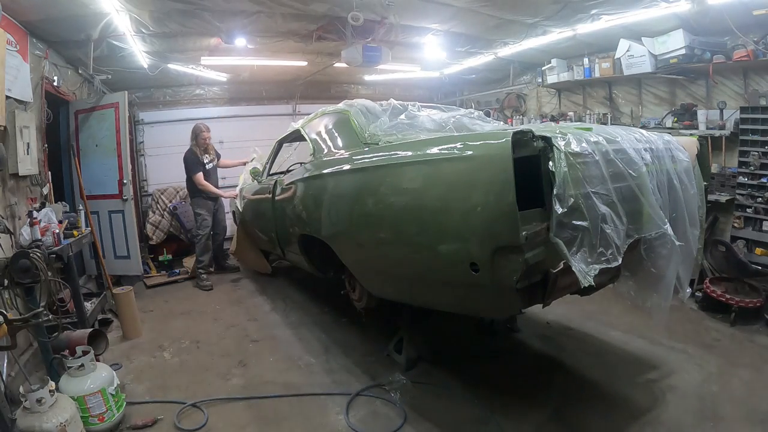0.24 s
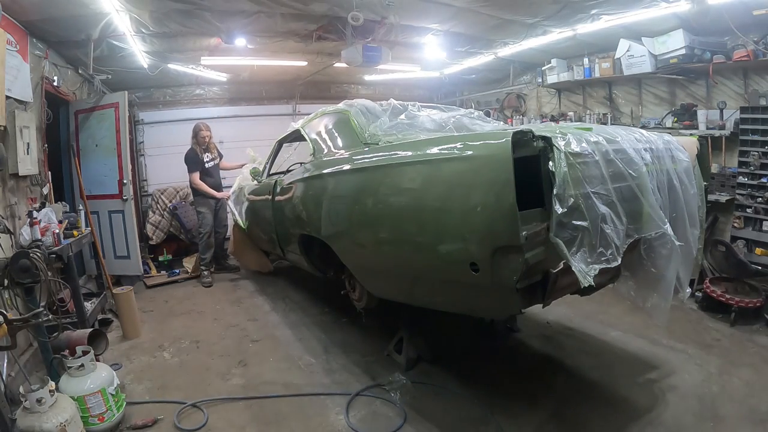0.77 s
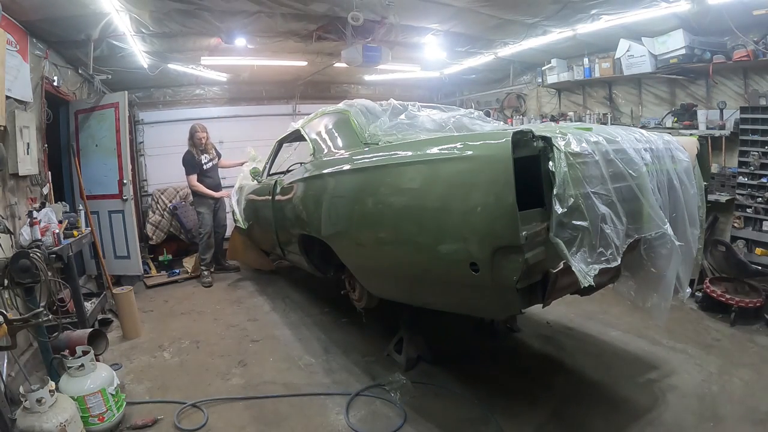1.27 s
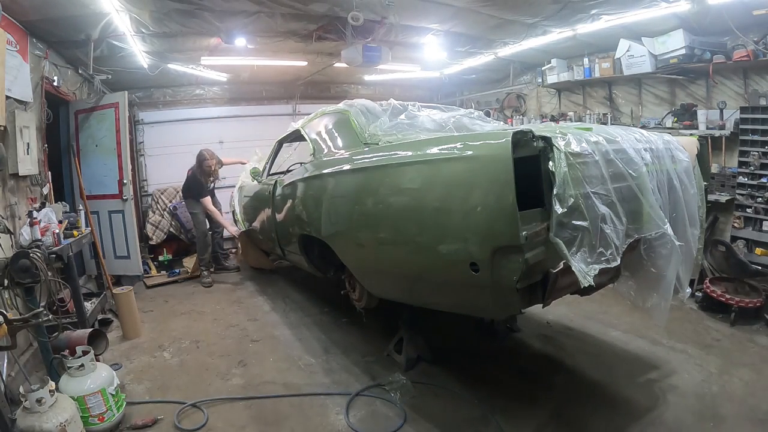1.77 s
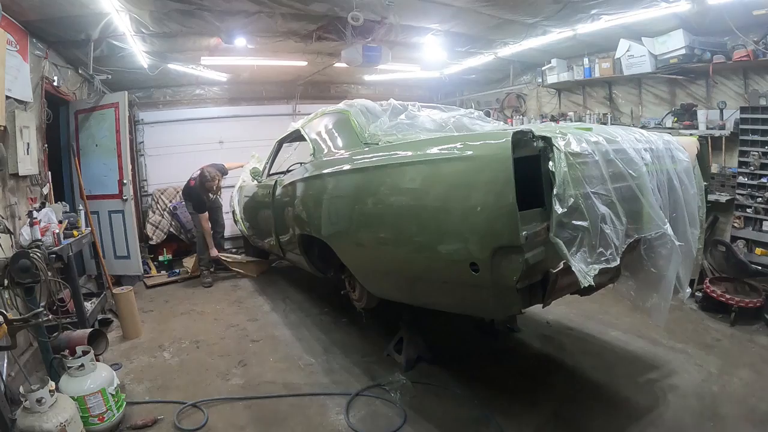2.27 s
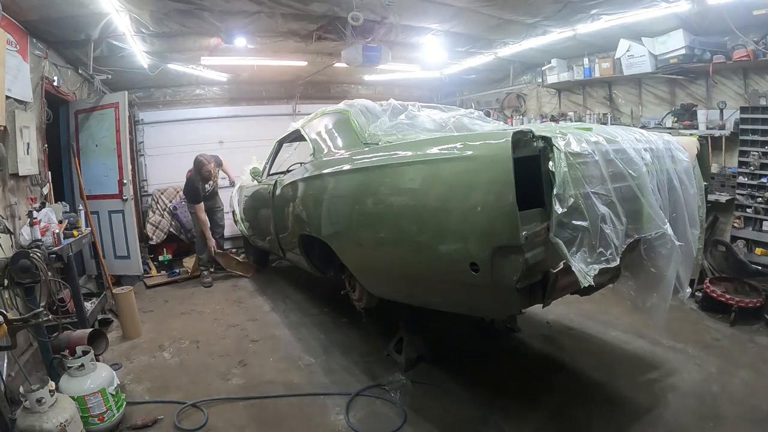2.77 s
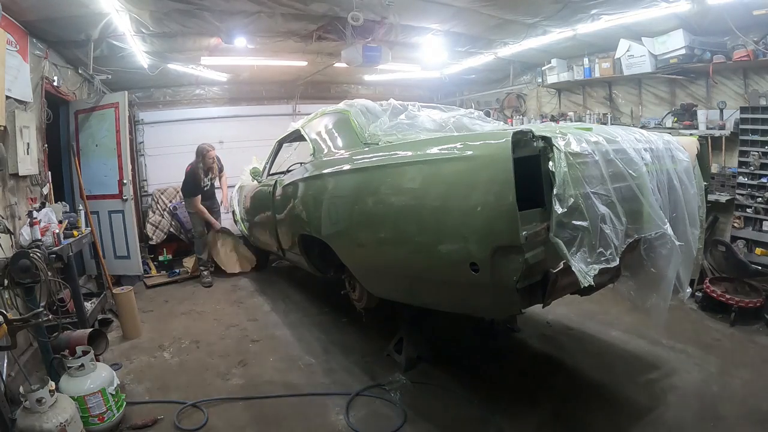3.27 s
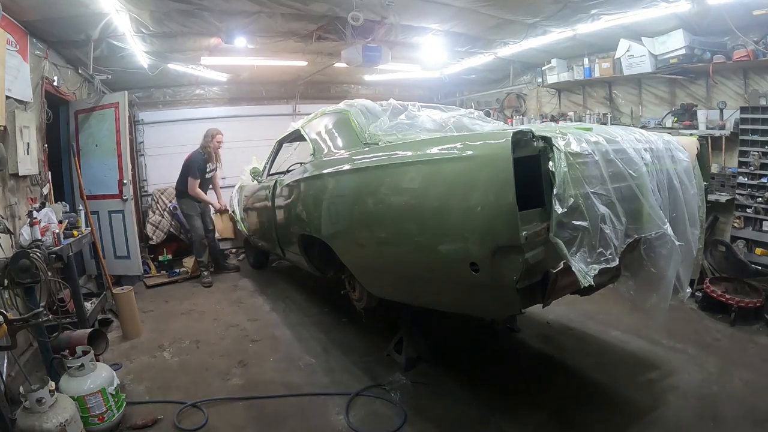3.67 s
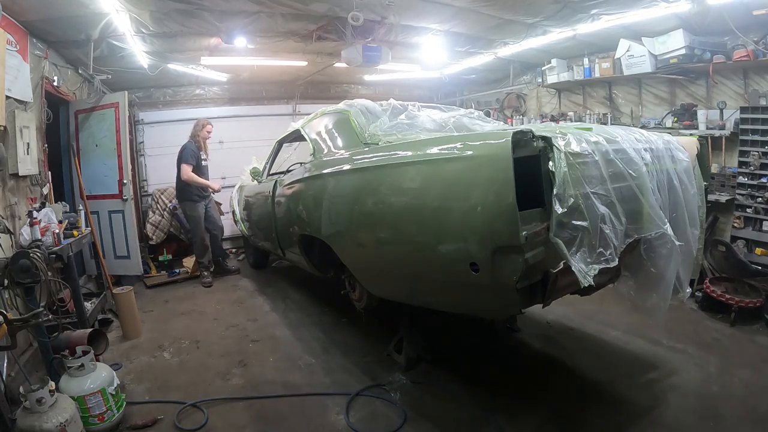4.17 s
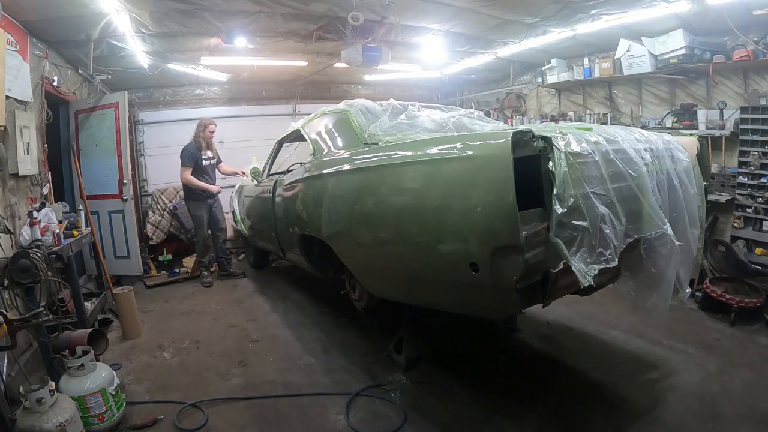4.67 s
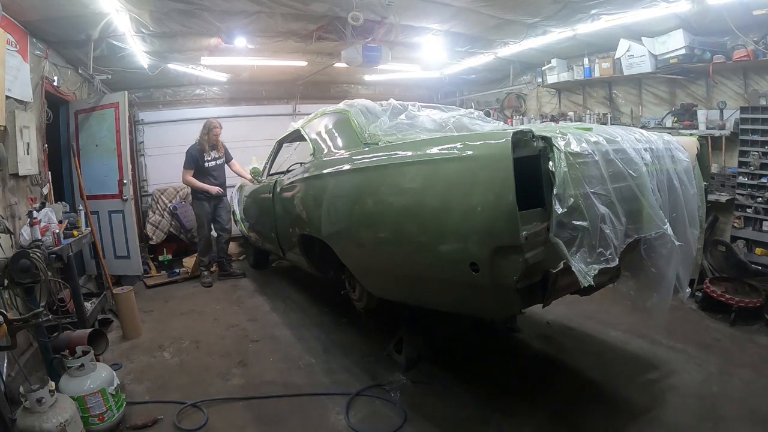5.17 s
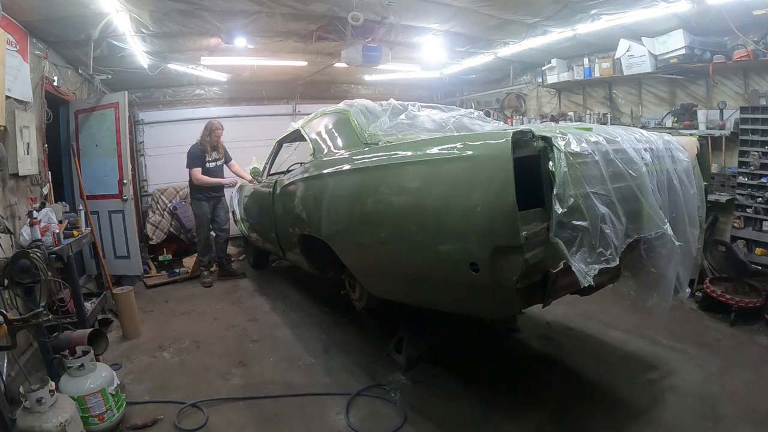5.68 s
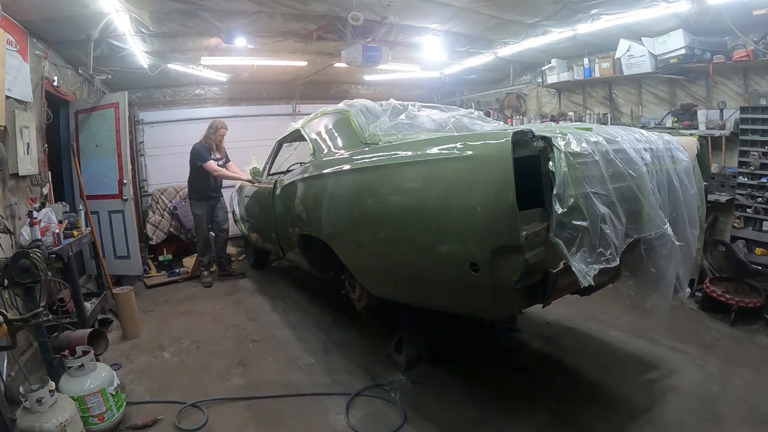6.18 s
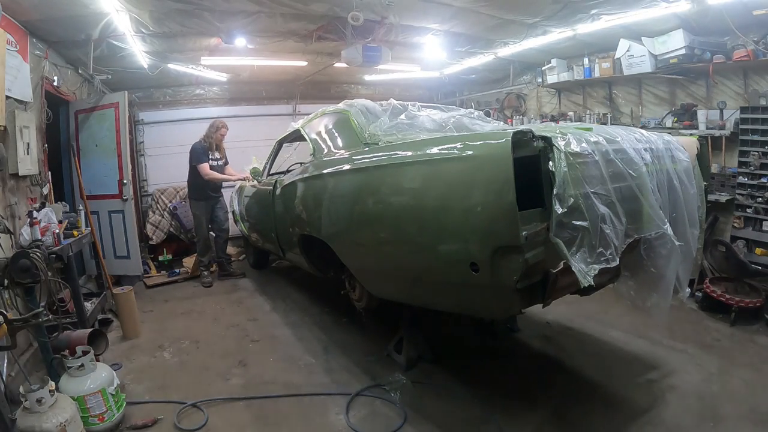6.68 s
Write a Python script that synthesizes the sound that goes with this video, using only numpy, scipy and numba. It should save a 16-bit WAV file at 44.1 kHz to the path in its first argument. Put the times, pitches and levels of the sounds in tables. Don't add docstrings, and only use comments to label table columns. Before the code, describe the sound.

Someone strips masking tape, paper and plastic sheet from a car body in a cluttered garage. Sharp ripping snaps and crinkly crackles burst out early, loudest around 0.7 and 2.1 seconds, with a soft thump and a short squeaky rub. More crumpling follows near 3.7 and 5 seconds, then sparse faint ticks. The stereo microphone stands several metres away, catching short room reflections, soft hiss and faint deep rumble.

```python
import sys
import numpy as np
from scipy import signal
from scipy.fft import rfft, irfft, next_fast_len
from scipy.io import wavfile
from scipy.ndimage import uniform_filter1d
from numba import njit

SR = 44100
rng = np.random.default_rng(int(sys.argv[2]) if len(sys.argv) > 2 else 0)


def undo_db(level):
    steps = np.asarray(level, float) / 20
    return 10 ** steps


def int16_out(signal):
    q = np.round(np.clip(np.atleast_2d(signal).T, -1, 1) * 32767)
    wavfile.write(sys.argv[1], SR, q.astype(np.int16))


N = 306054
TIME = np.arange(N) / SR


def shape(x, table):
    hz, db = np.transpose(table)
    log_hz = np.log(np.linspace(1, SR / 2, 1025))
    log_gain = np.interp(log_hz, np.log(hz), db) * np.log(10) / 20
    cepstrum = irfft(log_gain)
    cepstrum[1:1024] *= 2
    cepstrum[1025:] = 0
    response = irfft(np.exp(rfft(cepstrum)))
    return signal.fftconvolve(x, response)[:len(x)]


def band(x, lo_hz, hi_hz):
    return signal.sosfilt(signal.butter(2, [lo_hz, hi_hz], "band", fs=SR, output="sos"), x)


def unit(x):
    return x / np.sqrt(np.mean(x ** 2))


@njit
def ring_grains(count, start, hz, cycles, size, sr):
    out = np.zeros(count + 4096)
    for k in range(len(start)):
        turn = np.exp((2j * np.pi - 2.3 / cycles[k]) * hz[k] / sr)
        z = size[k] + 0j
        for i in range(min(4000, int(3 * cycles[k] * sr / hz[k]))):
            z *= turn
            out[start[k] + i] += z.imag
    return out[:count]


def grains(when_s, hz, cycles, size):
    return ring_grains(N, (when_s * SR).astype(np.int64), hz, cycles, size, 1. * SR)


def total(db):
    return 10 * np.log10(np.sum(undo_db(db) ** 2, axis=0) + 1e-12)


def hump(start, end, rise_db_s, fall_db_s):
    return -rise_db_s * np.maximum(start - TIME, 0) - fall_db_s * np.maximum(TIME - end, 0)


# f/Hz, level/dB
WIDE = [(100, -10), (400, -11.5), (1000, -11), (2500, -6.5), (5000, -8), (9000, -9), (13000, -4)]


def widen(side):
    return shape(side, WIDE)


# peak t/s, level/dB
RUMBLE = [(0.0, -49), (.25, -48), (.44, -56), (.79, -48.5), (1.02, -57), (1.33, -55.5), (1.59, -51),
          (1.91, -54), (2.3, -55), (2.45, -61), (2.72, -55), (3.17, -51.5), (3.45, -54), (3.72, -55.5),
          (3.9, -63), (4.04, -55), (4.46, -51), (4.75, -57.5), (5.1, -53.5), (5.39, -57), (5.55, -56),
          (5.85, -53.5), (6.11, -49), (6.3, -51.5), (6.75, -55)]
RUMBLE_DB_S = 91
# f/Hz, level/dB per Hz
HUSH = [(35, -13), (60, -32), (81, -11.5), (182, 6), (448, -10.5), (539, -11.5), (875, -15.5), (1270, -6.5),
        (2470, -28.5), (6840, -22), (10400, -32.5), (12200, -29.5), (15000, -44)]
HUSH_DB = -67


def background():
    s, db = np.transpose(RUMBLE)[:, :, None]
    swell_db = total(db + hump(s, s, RUMBLE_DB_S, RUMBLE_DB_S))
    rumble = undo_db(swell_db) * unit(band(rng.standard_normal(N), 26.5, 37))
    sway_db = np.array([[1.3], [-1.3]]) * np.sin(9 * TIME)
    mid, side = (shape(rng.standard_normal(N), HUSH) for _ in range(2))
    side = widen(side) * undo_db(7.0)
    hiss = undo_db(HUSH_DB) * np.array([mid + side, mid - side]) / np.std(mid)
    return rumble * undo_db(sway_db) + hiss


# t/s, crinkle level/dB, fine crackle level/dB re crinkle
HANDLING = [(0.0, -58.5, 3), (.45, -48, 4), (.66, -40, 3.5), (.76, -50, 2), (1.15, -59, -0.5),
            (1.5, -51.5, -0.5), (1.8, -55.5, 2), (2.3, -39, -6.5), (2.78, -44.5, -0.5), (3.3, -47.5, -7.5),
            (4.35, -57, 4.5), (4.55, -46, -0.5), (4.99, -74, -10), (5.2, -48.5, -2), (5.9, -82.5, -2.5),
            (6.45, -74.5, 0.5), (6.6, -63, 1.5), (6.94, -68, 2)]
HANDLING_FOLD_DB = -12.5


def handling():
    s, *columns = np.transpose(HANDLING)
    crinkle, fine = (np.interp(TIME, s, column) for column in columns)
    return crinkle, crinkle + fine, crinkle + HANDLING_FOLD_DB


# start t/s, hold t/s, crinkle level/dB, fine crackle and big-fold flap level/dB re crinkle
RIPS = [(0.0433, .012, -46.5, -1.5, -20), (.7042, 0.033, -27, 2, -8), (0.9053, .045, -33, 5.5, -11),
        (1.275, .02, -51, 8, -16), (1.3196, 0.054, -52.5, 10.5, 0), (1.3722, .058, -40, 6, -3),
        (1.8537, 0.12, -47.5, -9, -10), (1.9176, 0.11, -33.5, -1.5, -3), (2.2063, 0.019, -35, 1.9, -30),
        (2.39, 0.043, -36, -1, -33), (2.4943, .006, -47, 8, -22), (2.588, 0.035, -39, 3.5, -13),
        (2.8606, 0.054, -37.5, 0.5, -4.5), (3.088, .008, -41, 6, -16), (3.5925, 0.057, -36.5, -0.5, -6),
        (4.07, 0.036, -35, 2.5, -11.5), (4.365, 0.014, -37, -3, -28), (4.592, 0.015, -42, 1, -23),
        (4.982, .05, -40, 1, -21), (5.455, .012, -45.5, -3, -25), (5.567, 0.051, -49, -2.5, -28),
        (5.764, .02, -76, 10.5, -11), (6.1499, 0.058, -61.5, -1.5, 6), (6.5077, .03, -55, -2.5, -9)]
RIP_LAG_S, RIP_ATTACK_S = .0015, 0.0034
FADE_DB_S = 190


def rips():
    s, hold, db, fine, fold = np.transpose(RIPS)[:, :, None]
    crinkle = db + hump(s + RIP_LAG_S + RIP_ATTACK_S, s + hold, 20 / RIP_ATTACK_S, FADE_DB_S)
    return crinkle, crinkle + fine, crinkle + fold


# t/s, peak level/dB,
# ring f/Hz
SNAPS = [(0.145, -37.5, 1380), (0.4638, -34, 4570), (0.709, -11, 1290), (2.4956, -20, 4000),
         (1.7315, -38, 1950), (2.0772, -13, 1430), (2.1276, -16.5, 925), (2.4162, -29, 2850),
         (2.541, -32, 4060), (2.6068, -23.5, 5000), (3.0081, -40, 920), (1.3158, -35.5, 5500),
         (3.4089, -24, 1450), (3.491, -20.5, 3400), (3.6863, -14.5, 1090), (3.7445, -24.5, 2270),
         (3.8727, -37, 2640), (1.3734, -27, 1500), (3.976, -31, 1650), (4.0252, -27, 1100),
         (5.0113, -22, 2370), (5.0379, -22, 1300), (5.3219, -32.5, 1870), (6.2256, -30, 1200),
         (6.7147, -58, 2780), (6.8376, -37, 1430)]
SNAP_DB, SNAP_PER_FINE = 12.5, -0.11
SNAP_HZ, DB_PER_OCTAVE = 1660, 4.5


def snaps():
    s, _, db, fine, _ = np.transpose(RIPS)
    snap_db = db + SNAP_PER_FINE * np.maximum(fine, 0) + SNAP_DB
    hz = SNAP_HZ * 2 ** (np.maximum(fine, -2) / DB_PER_OCTAVE)
    return np.hstack([[s, snap_db, hz], np.transpose(SNAPS)])


TEAR_MS, TEAR_DB, TEAR_OCTAVES = 9., -15, 0.84


def tape():
    s, db, hz = snaps()[:, :, None]
    start = s + 0.000981
    wait, spread, size = rng.standard_normal((len(s), 3, 60)).transpose(1, 0, 2)
    tear_hz = np.clip(1.25 * hz * 2 ** (TEAR_OCTAVES * spread), 750, 14000)
    tear_gain = undo_db(db + TEAR_DB) * size * np.abs(size) * hz / 2000
    when = np.hstack([start, start, start + np.abs(wait) * TEAR_MS / 1000])
    ring_hz = np.hstack([hz, 5500 + 0 * s, tear_hz])
    cycles = np.hstack([1.2 + 0 * s, .6 + 0 * s, 1.1 + 0 * size])
    gain = np.hstack([undo_db(db - 3), undo_db(db), tear_gain])
    return grains(when.ravel(), ring_hz.ravel(), cycles.ravel(), gain.ravel())


# peak t/s, rise t/s, crinkle level/dB, fine crackle and folds level/dB re crinkle
CRUMPLES = [(.16, 0.022, -57, -7, -17), (.57, 0.16, -41, 5.5, -2.5), (1.739, 0.02, -48, 1, -19),
            (2.127, 0.1, -24.5, -0.7, -6.5), (2.551, 0.02, -39, -5, -14), (2.698, 0.098, -43.5, 5, -4),
            (3.032, .03, -46, 0.1, -14), (3.21, 0.049, -40.5, -6.5, -20), (3.301, 0.082, -40, -3.5, -9.5),
            (3.421, 0.035, -39.5, -0.5, -4), (3.499, 0.14, -34.5, 1, -13),
            (3.691, 0.086, -28.5, -0.5, -9.5), (3.741, 0.018, -35, -0.5, -24),
            (3.879, 0.068, -41.5, -5, -10), (4.031, 0.023, -41, -3.5, -9.5), (4.27, .08, -50, 4, -18),
            (4.43, 0.03, -47.5, -4, -17), (5.055, .06, -28.5, -1, -12), (5.33, 0.042, -60, -16, -13),
            (6.25, 0.044, -45, -2.5, -16), (6.67, .14, -59.5, 2.5, 6.5), (6.72, 0.047, -51, -4.5, 3),
            (6.849, 0.11, -56, 3.5, 0.5)]
CRUMPLE_RISE_DB = 21


def crumples():
    s, rise, db, fine, fold = np.transpose(CRUMPLES)[:, :, None]
    crinkle = db + hump(s, s, CRUMPLE_RISE_DB / rise, FADE_DB_S)
    return crinkle, crinkle + fine, crinkle + fold


def effort():
    return [total(np.vstack(levels)) for levels in zip(rips(), crumples(), handling())]


def grip():
    s = np.sort(snaps()[0])
    until = np.append(s, 99)[np.searchsorted(s, TIME)] - TIME
    jerks = undo_db(2.76 * np.repeat(rng.standard_normal(N // 300 + 1), 300)[:N])
    return jerks * (1 - .6 * np.exp(-until / 0.0037))


def at_source(db):
    power = uniform_filter1d(undo_db(db) ** 2, size=150)
    return np.sqrt(np.maximum(power + 0.019 * SR * np.gradient(power), .04 * power))


def swarm(lo_hz, hi_hz, rate, cycles, scatter_db):
    when, pitch, size, sign, turn = rng.random((5, 50000))
    live = np.clip((rate / 7200 - turn) * 30, 0, 1)
    hz = lo_hz * (hi_hz / lo_hz) ** pitch
    strength = undo_db(-scatter_db * np.log(1.02 - size))
    gain = live * np.sign(sign - .5) * strength * np.sqrt(hz)
    buckles = grains(when * N / SR, hz, cycles + 0 * hz, gain)
    return unit(band(buckles, 0.79 * lo_hz, 1.83 * hi_hz))


def sheet(crinkle_db, crackle_db, fold_db):
    folds = at_source(fold_db - 0.5) * swarm(480, 1004, rate=1480, cycles=2.2, scatter_db=2.5)
    crinkle = at_source(crinkle_db - 3.5) * swarm(1016, 2890, rate=2500, cycles=2.1, scatter_db=3.0)
    crackle = at_source(crackle_db + 1.5) * swarm(3200, 12000, rate=3000, cycles=1.2, scatter_db=3.6)
    return folds + crinkle + crackle


# f/Hz, level/dB
CAPSULE = [(60, -26), (330, -7.5), (800, -8), (1100, -2), (3000, -0.5), (7500, -4), (9500, -15),
           (12500, -14.5), (14800, -32.5), (15800, -54.5)]


def capsule(x):
    return shape(x, CAPSULE)


# f/Hz, t60/s
GARAGE = [(300, 0.32), (1500, 0.36), (5000, 0.37), (12000, 0.29)]
FIRST_WALL_S, SPREAD_S = .004, 0.019
PLACES = 6
DIRECT_DB = -4.5


def garage():
    t = TIME[:16000]
    late = np.maximum(t - SPREAD_S, 0)
    scatter_db = 10.46 * np.exp(-t / 0.012) * rng.standard_normal((PLACES, 1, len(t)))
    sparse = undo_db(scatter_db) * (t > FIRST_WALL_S)
    hz, t60 = np.transpose(GARAGE)
    tail = 0
    for f in 60 * 2. ** np.arange(9):
        noise = sparse * rng.standard_normal((PLACES, 2, len(t)))
        octave = band(noise, f / 2 ** .5, min(f * 2 ** .5, 21000))
        tail = tail + octave * undo_db(-60 * late / np.interp(np.log(f), np.log(hz), t60))
    return tail / np.sqrt(np.mean(np.sum(tail ** 2, axis=2)))


def reverberate(work):
    place = np.repeat(rng.integers(0, PLACES, N // 600 + 1), 600)[:N]
    size = next_fast_len(N + 16000)
    heard = 0
    for k, echoes in enumerate(garage()):
        heard = heard + rfft(work * (place == k), size) * rfft(echoes, size)
    return irfft(heard, size)[:, :N]


# middle t/s, length t/s, boom level/dB
SWEEPS = [(0.755, .04, -37), (0.951, 0.037, -44), (1.487, 0.14, -53.5), (2.073, 0.19, -46),
          (2.92, .05, -55.5), (3.097, 0.045, -57), (3.67, 0.071, -52), (4.104, 0.034, -47),
          (4.574, 0.093, -54), (5.055, 0.077, -57), (6.184, 0.034, -60), (6.694, 0.082, -59.5),
          (6.86, .08, -63.5)]
SWEEP_RISE_DB_S, SWEEP_DB_S = 350, 199.5
BOOM_DB = -22


def sweeps(crinkle_db):
    s, length, db = np.transpose(SWEEPS)[:, :, None]
    swells = db + hump(s - length / 2, s + length / 2, SWEEP_RISE_DB_S, SWEEP_DB_S)
    return total(np.vstack([swells, crinkle_db + BOOM_DB]))


# f/Hz, bandwidth f/Hz, level/dB
BOOM = [(173.3, 12.9, -1), (198.4, 23.2, 0.5), (232.5, 12, -6)]


def boom(db):
    push = rng.standard_normal(N)
    modes = sum(undo_db(g) * unit(band(push, hz - w / 2, hz + w / 2)) for hz, w, g in BOOM)
    return undo_db(db) * unit(modes)


# t/s, peak level/dB, f/Hz
THUDS = [
    (0.221, -38.5, 223),
    (0.232, -47, 314),
    (0.245, -44, 205),
    (0.74, -31, 188),
    (5.05, -46, 320),
    (6.155, -44.5, 199),
    (6.17, -49, 560),
    (6.178, -43.5, 403),
]


def thuds():
    s, peak_db, hz = np.transpose(THUDS)
    return grains(s, hz, 8.0 + 0 * s, undo_db(peak_db))


# t/s, level/dB, ring f/Hz
SLIDE = [
    (0.48, -56, 2360),
    (0.506, -41, 2260),
    (0.548, -30.5, 2380),
    (0.616, -43, 2350),
    (0.682, -38.5, 2220),
    (0.7, -39.5, 2250),
]


def slide():
    s, db, hz = np.transpose(SLIDE)
    when, spread, sign = rng.random((3, 1500))
    when = s[0] + when * (s[-1] - s[0])
    ring_hz = np.interp(when, s, hz) * (1 + 0.44 * (spread - .5))
    size = np.sign(sign - .5) * undo_db(np.interp(when, s, db) + 0.5)
    return grains(when, ring_hz, 2.7 + 0 * when, size)


# f/Hz, level/dB
LEFTWARD = [(100, 1), (500, -1.2), (1200, 1.5), (5000, 2.5), (12000, 3)]


def ports(mid, side):
    left = shape(mid + side, [(hz, db / 2) for hz, db in LEFTWARD])
    right = shape(mid - side, [(hz, -db / 2) for hz, db in LEFTWARD])
    return np.array([left, right])


def scene():
    crinkle_db, crackle_db, fold_db = effort()
    pulled = grip() * sheet(crinkle_db, crackle_db, fold_db)
    work = capsule(pulled + slide() + tape() / undo_db(DIRECT_DB))
    mid, side = reverberate(work)
    mid = mid + undo_db(DIRECT_DB) * work + boom(sweeps(crinkle_db)) + thuds()
    return ports(mid, widen(side)) + background()


def band_limit(x):
    return signal.sosfilt(signal.butter(12, 15680, fs=SR, output="sos"), x)


def record(dry):
    return band_limit(dry)


dry = scene()
out = record(dry)
int16_out(out)
```